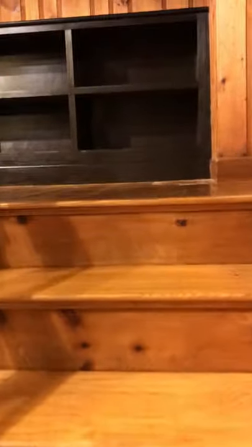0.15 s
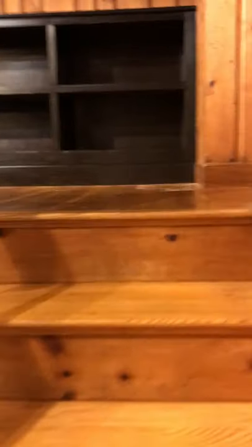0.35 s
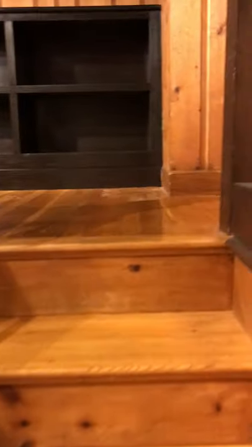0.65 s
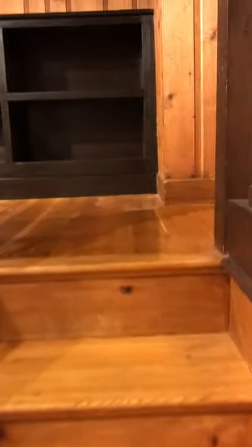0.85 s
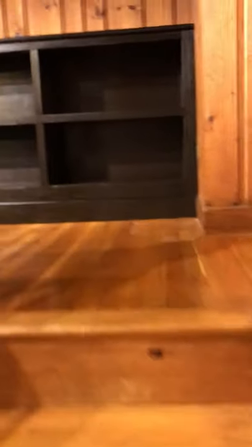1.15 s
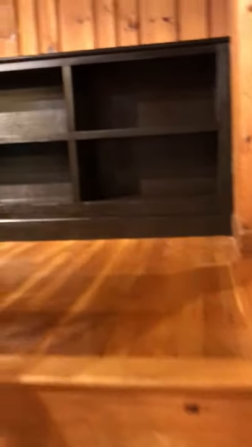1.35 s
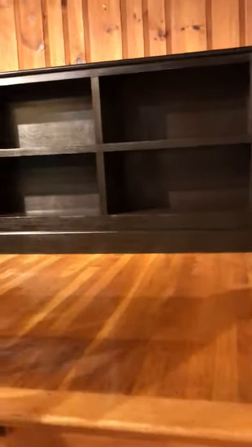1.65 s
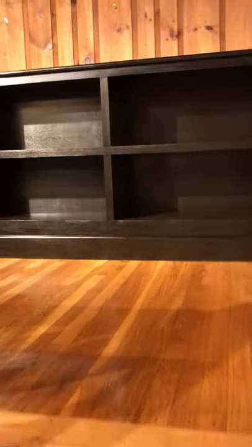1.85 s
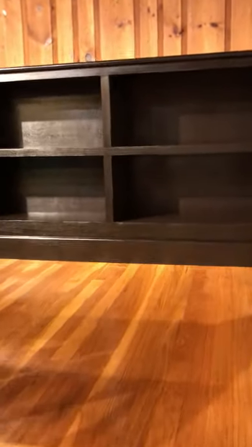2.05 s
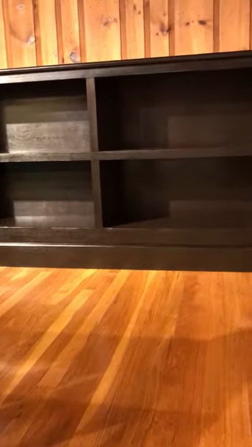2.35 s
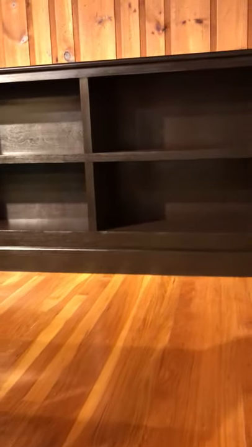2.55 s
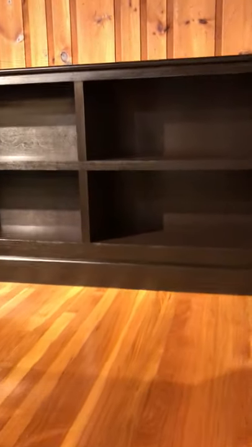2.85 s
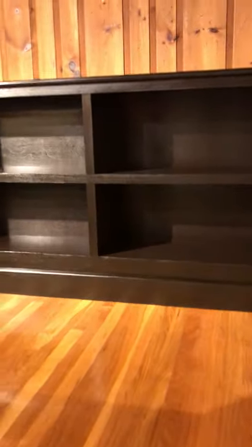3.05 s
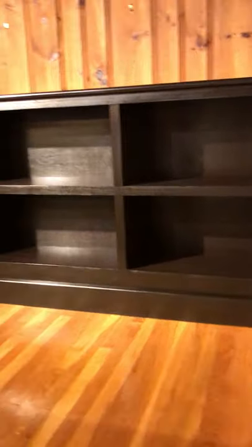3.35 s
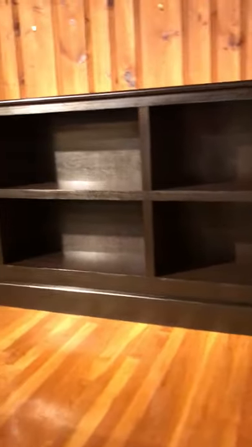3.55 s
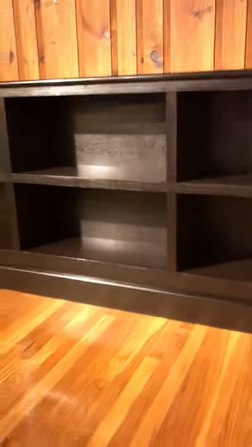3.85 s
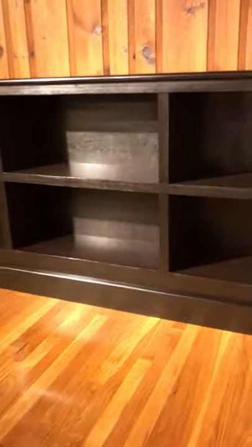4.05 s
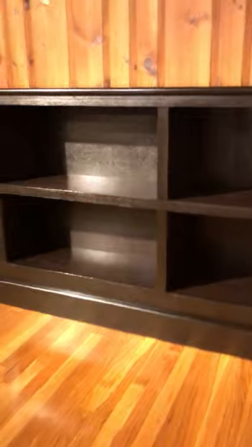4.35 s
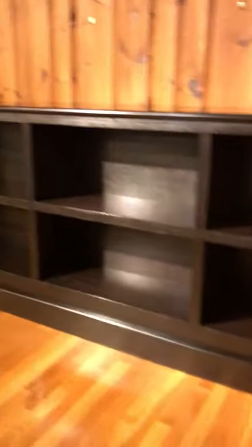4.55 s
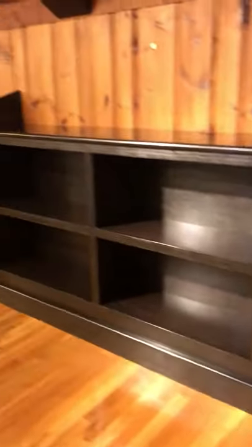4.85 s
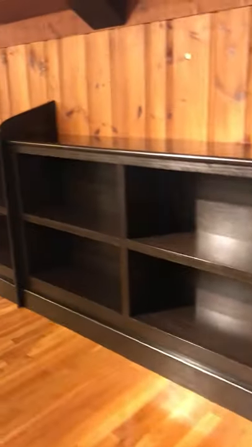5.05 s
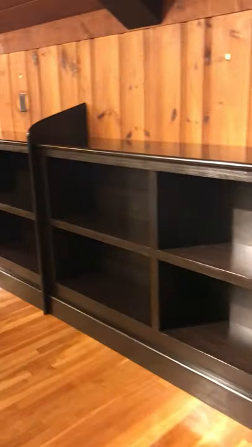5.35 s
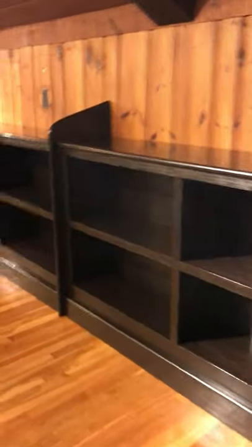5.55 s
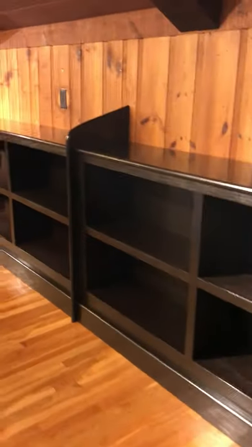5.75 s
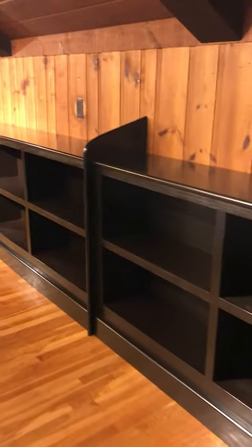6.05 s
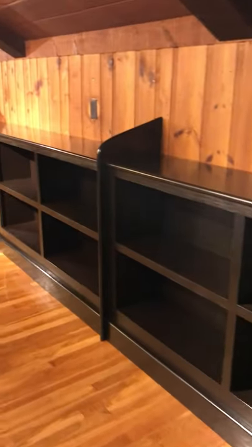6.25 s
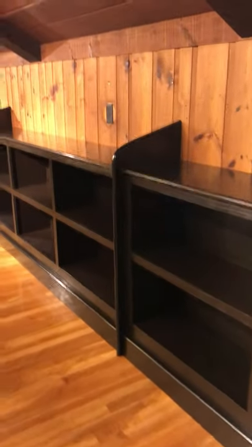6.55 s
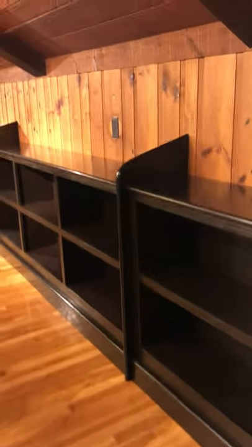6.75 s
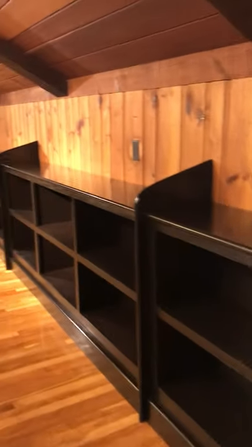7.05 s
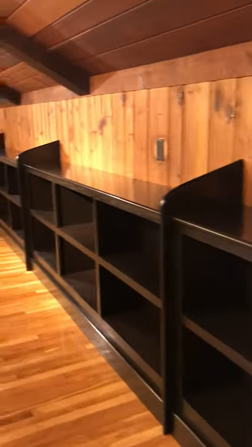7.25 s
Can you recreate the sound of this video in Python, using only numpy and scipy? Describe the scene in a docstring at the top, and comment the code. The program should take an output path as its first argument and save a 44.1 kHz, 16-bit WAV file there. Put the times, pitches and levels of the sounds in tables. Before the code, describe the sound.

Shoes thud and knock up wooden steps, then along floorboards at an unhurried pace in a quiet room.

```python
"""Over a faint hum and microphone hiss, weight rolls onto wood and clothes rustle as the legs swing.
Shoes climb hollow wooden stairs and walk on over a board floor in a panelled room. Each heel, toe and
settling joint excites wood and sole: a thud, knock, clack, crack and fizz in its own mix, then the room
rings on. Joints squeak faintly near 1.7, 2.3, 3.0 and 6.2 s; the steps go on to the end at 7.4 s."""
import sys
import numpy as np
from scipy import signal
from scipy.fft import rfft, irfft, next_fast_len
from scipy.io import wavfile
from scipy.ndimage import map_coordinates

SR = 44100
rng = np.random.default_rng(int(sys.argv[2]) if len(sys.argv) > 2 else 0)


def file_out(sig):
    """Save sig as 16-bit WAV at sys.argv[1]."""
    # one column per channel
    cols = np.atleast_2d(sig).T
    # limit, then scale
    lim = np.clip(cols, -1, 1)
    pcm = np.round(lim * 32767).astype(np.int16)
    wavfile.write(sys.argv[1], SR, pcm)


N = 326604


def amp(db):
    """Gain of a level in dB."""
    return 10 ** (np.asarray(db) / 20)


def unit_rms(x):
    """x at rms 1."""
    return x / np.sqrt(np.mean(x ** 2) + 1e-20)


def curve_at(points, hz):
    """(Hz, value) points interpolated on a log frequency axis."""
    points_hz, values = np.transpose(points)
    return np.interp(np.log(hz + 1), np.log(points_hz + 1), values)


def wobble(rate_hz):
    """Smooth random curve, rate_hz knots a second."""
    knots = rng.standard_normal(int(N * rate_hz / SR) + 4)
    return map_coordinates(knots, [np.arange(N) * rate_hz / SR])


def filtered(x, response):
    """x through a complex frequency response."""
    size = next_fast_len(N + SR // 2)
    return irfft(rfft(x, size) * response(np.fft.rfftfreq(size, 1 / SR)), size)[..., :N]


def resonances(modes, hz):
    """Causal response of a set of modes, unit power gain."""
    response = sum((-1) ** k * amp(db) * 1j * hz * width_hz / (mode_hz ** 2 - hz ** 2 + 1j * hz * width_hz)
                   for k, (mode_hz, width_hz, db) in enumerate(modes))
    # a yielding contact drives little far above the highest mode
    response = response / (1 + 1j * hz / (1.76 * modes[-1][0]))
    return response / np.sqrt(np.mean(np.abs(response) ** 2))


def grainy_noise(modes, grain_db):
    """Noise through modes, its level roughened by grain_db; rms 1."""
    noise = filtered(rng.standard_normal(N), lambda hz: resonances(modes, hz))
    return unit_rms(amp(grain_db) * noise)


def swells(peak_s, peak_db, rise_s, fall_s, rest_db):
    """Gain of overlapping swells, linear in dB, over a resting level."""
    hop = 32
    since_peak_s = np.arange(0, N, hop) / SR - peak_s[:, None]
    span_s = np.where(since_peak_s < 0, -rise_s[:, None], fall_s[:, None])
    level_db = peak_db[:, None] - 20 * since_peak_s / span_s
    power = amp(rest_db) ** 2 + np.sum(amp(level_db) ** 2, axis=0)
    return np.repeat(np.sqrt(power), hop)[:N]


# Background spectrum. Each row: frequency in Hz, relative density in dB.
BED_SPECTRUM = [(15, -35), (28, 21.5), (72, 8), (174, -10), (291, -8), (460, -18), (1150, -15), (1600, -21),
                (4500, -27.5), (5500, -25), (6250, -12), (7000, -21), (10500, -39), (14100, -21),
                (15800, -18)]


def hum_and_hiss(level_db=-69):
    """Steady noise: low hum of still air, microphone hiss."""
    noise = filtered(rng.standard_normal(N), lambda hz: amp(curve_at(BED_SPECTRUM, hz)))
    return amp(level_db) * unit_rms(noise)


# Modes of tread, board and sole. Each row: frequency in Hz, width in Hz, relative gain in dB.
TREAD_MODES = [(43.8, 15, -2.5), (55.8, 65, -6.5), (76, 26.7, 4.5), (110.4, 21, 0.5), (137, 31.4, 0),
               (194.4, 30.5, 0)]
BOARD_MODES = [(240.4, 44.5, 0.5), (331, 79, -0.5), (412.4, 83.5, -1.5), (572, 175, -3.5), (680, 160, -6)]
SOLE_MODES = [(763, 170, 4), (1010, 265, 5.5), (1272, 240, 6), (1662, 440, 3), (2255, 530, 1.5),
              (2953, 750, -1)]
# Weight shifts. Each row: peak in seconds, rumble and scuff in dB, 20 dB rise and fall in seconds.
WEIGHT_ROLLS = [(0, -57.5, -70, .1, .3), (.23, -50, -58.5, .07, .3), (.39, -49.5, -68, .13, .12),
                (.45, -66, -49, .09, .28), (.56, -55, -63, .4, .2), (1.03, -46, -60, .04, .14),
                (1.11, -62, -52.5, .25, .14), (1.3, -55, -61, .5, .25), (1.62, -63, -73, .3, .3),
                (1.99, -47, -60, .15, .22), (2.14, -65, -60, .8, .33), (2.56, -70, -66, .1, .2),
                (2.72, -43, -50.5, .06, .18), (2.82, -52, -58, .2, .65), (3.28, -62, -56, .25, .26),
                (3.77, -48.5, -63, .09, .4), (3.9, -58, -64, .5, .8), (4.2, -66, -67, .6, .2),
                (4.63, -50, -55.5, .15, .45), (4.77, -56, -66, .3, .15), (5.15, -64, -72, .5, .5),
                (5.63, -44, -49.5, .1, .3), (5.82, -60, -62, .3, .3), (6.53, -56, -67, .15, .5),
                (6.68, -68, -59, .25, .6), (6.86, -49, -62, .08, .15), (7.15, -58, -58, .3, .45),
                (7.35, -59, -70, .15, .2)]


def rolling_weight():
    """Weight rolls over a board: lumpy rumble in the wood, finer scuff in the sole."""
    peak_s, rumble_db, scuff_db, rise_s, fall_s = np.transpose(WEIGHT_ROLLS)
    lumps = wobble(30)
    rumble = grainy_noise(TREAD_MODES + BOARD_MODES, 2 * lumps)
    scuff = grainy_noise(SOLE_MODES, lumps + 0.8 * wobble(90))
    return (rumble * swells(peak_s, rumble_db, rise_s, fall_s, rest_db=-71)
            + scuff * swells(peak_s, scuff_db, rise_s, fall_s, rest_db=-78))


# Cloth friction bands. Each row: frequency in Hz, width in Hz, relative gain in dB.
RUSTLE_BANDS = [(3630, 1670, 0), (6290, 1340, 0)]
SWISH_BANDS = [(8330, 4600, 0), (13440, 2600, 0)]
# Leg swings. Each row: peak in seconds, rustle and swish in dB, 20 dB rise and fall in seconds.
LEG_SWINGS = [(.05, -76, -77, .3, .3), (.3, -71, -76, .2, .2), (.39, -62, -67, .05, .4),
              (.45, -56, -75, .12, .29), (1.12, -59, -74, .1, .28), (1.16, -68, -71, .1, .3),
              (1.29, -70, -71, .3, .15), (1.54, -73, -71, .08, .5), (1.67, -68, -74, .25, .25),
              (2.13, -66.5, -75, .3, .35), (2.56, -69, -78, .15, .2), (2.7, -63, -76, .1, .4),
              (2.78, -64, -73, .2, .18), (3.12, -64.5, -68, .13, .5), (3.27, -62, -72, .2, .3),
              (3.71, -68, -84, .12, .2), (3.88, -69, -79, .12, .2), (4.0, -74, -76, .15, .4),
              (4.12, -66, -75, .15, .35), (4.34, -78, -74, .15, .3), (4.41, -67, -82, .04, .2),
              (4.65, -63, -74, .13, .22), (4.96, -75, -78, .15, .8), (5.63, -58, -73, .08, .29),
              (5.85, -80, -81, .4, .3), (6.64, -64, -84, .12, .25), (6.85, -76, -78, .2, .2),
              (7.11, -64, -76, .12, .3)]


def clothes():
    """Cloth rubs as a leg swings: a rustle and a brighter swish with the same grain."""
    peak_s, rustle_db, swish_db, rise_s, fall_s = np.transpose(LEG_SWINGS)
    grain = wobble(150)
    rustle = grainy_noise(RUSTLE_BANDS, 0.75 * grain)
    swish = grainy_noise(SWISH_BANDS, 0.71 * grain)
    return (rustle * swells(peak_s, rustle_db, rise_s, fall_s, rest_db=-81)
            + swish * swells(peak_s, swish_db, rise_s, fall_s, rest_db=-81.5))


def struck_modes(modes, pitch_hz, db_per_octave):
    """Where the foot lands decides which modes speak: those far from the pitch are weaker."""
    return [(hz, width_hz, db - db_per_octave * abs(np.log2(hz / pitch_hz))) for hz, width_hz, db in modes]


# Treble modes of a contact. Each row: frequency in Hz, width in Hz, relative gain in dB.
CRACK_MODES = [(3330, 2200, 1), (4770, 2200, 1), (6450, 1700, -3.5)]
FIZZ_MODES = [(8300, 790, 1), (13500, 3700, -4.8)]
# Heel, toe and joint contacts. Each row: start in seconds, clack, thud, knock, crack and fizz in dB,
# thud, knock and clack pitch in Hz, base decay time in seconds, relative ring-on of wood and room in dB.
STEP_CONTACTS = [(0.081, -59.5, -59, -67, -67, -70, 121, 396, 1140, 0.0067, 5.5),
                 (0.144, -55.5, -54, -52.5, -77, -78, 186, 342, 904, 0.013, 6),
                 (0.176, -51, -39.5, -50, -69, -79, 170, 221, 1070, 0.014, 0),
                 (0.197, -51, -48, -46, -76, -75, 70.0, 579, 1380, 0.0079, 1),
                 (0.221, -50, -38, -60, -65, -71, 199, 221, 991, 0.0056, -2.5),
                 (0.241, -45, -43, -42, -47.5, -84, 218, 223, 1230, 0.0094, -4),
                 (0.274, -45.5, -54, -46, -70, -79, 194, 293, 832, 0.013, -0.5),
                 (0.296, -51, -57, -38.5, -72, -73, 218, 229, 816, 0.0079, -6),
                 (0.359, -42.5, -42, -47, -41.5, -61, 91.5, 266, 2300, 0.01, 3),
                 (0.439, -48, -47, -40, -43.5, -61, 75.4, 257, 845, 0.012, 3),
                 (0.944, -40, -31, -36.5, -48.5, -69, 110, 320, 880, 0.0079, 0.5),
                 (1.02, -35.5, -38, -38, -32, -41.5, 113, 221, 1660, 0.0065, -10.5),
                 (1.082, -33, -27.5, -27.5, -35.5, -43.5, 116, 377, 2180, 0.0086, -10),
                 (1.116, -46, -40, -39, -67, -70, 186, 283, 880, 0.0059, 4),
                 (1.172, -34, -26.5, -28.5, -44.5, -50, 103, 360, 1180, 0.0082, -4),
                 (1.809, -55, -32.5, -37, -58, -67, 124, 221, 1130, 0.0053, -2.5),
                 (1.827, -45.5, -56, -49, -49, -71, 67.3, 253, 1180, 0.0091, 1.5),
                 (1.852, -51, -40, -46, -62, -79, 102, 328, 1730, 0.0084, 4.5),
                 (1.884, -47, -67, -44.5, -54, -81, 143, 417, 1120, 0.014, -0.5),
                 (1.902, -54, -50, -42.5, -76, -85, 210, 221, 1390, 0.0062, 1),
                 (1.978, -45, -44, -60, -56, -85, 110, 388, 1520, 0.0076, 0),
                 (2.022, -50, -49, -50, -72, -78, 110, 401, 1710, 0.0069, 0),
                 (2.097, -54, -46, -45.5, -57, -83, 127, 331, 1010, 0.0074, 3.5),
                 (2.14, -63, -53, -60, -59, -72, 82, 240, 1130, 0.0064, 3),
                 (2.321, -59, -61, -63.5, -66, -78, 186, 710, 1060, 0.0074, 6),
                 (2.53, -54.5, -61, -49, -54.5, -81, 91.5, 340, 816, 0.0076, 2),
                 (2.63, -31, -31, -27.5, -41, -80, 164, 611, 790, 0.011, -2.5),
                 (2.642, -31, -39, -41, -68, -80, 218, 245, 842, 0.005, -4),
                 (2.71, -39.5, -48, -33, -49, -59, 140, 270, 926, 0.0062, -1.5),
                 (2.735, -50, -42, -40, -51.5, -77, 218, 238, 851, 0.0075, 2.5),
                 (2.765, -41.5, -42.5, -36.5, -66, -75, 146, 346, 1050, 0.016, 4),
                 (3.179, -40.5, -61, -47.5, -39.5, -51, 167, 724, 1110, 0.0067, 5),
                 (3.196, -32, -66, -47, -38, -39.5, 218, 799, 970, 0.01, -5),
                 (3.534, -72, -68, -64, -55, -54, 70.0, 310, 960, 0.0033, -3),
                 (3.56, -48.5, -44, -40.5, -53, -76, 147, 267, 1490, 0.0094, 2),
                 (3.646, -54, -72, -64, -62, -58, 210, 221, 926, 0.0066, 1),
                 (3.657, -45.5, -46, -44, -54.5, -60, 218, 366, 2180, 0.0066, -1),
                 (3.667, -42, -39, -38, -66, -70, 153, 535, 1010, 0.0088, -3),
                 (3.81, -51.5, -50, -63, -69, -81, 113, 377, 1380, 0.0065, 11),
                 (4.06, -47, -51.5, -45.5, -49, -81, 127, 226, 853, 0.007, 5),
                 (4.385, -37.5, -35, -35, -66, -92, 162, 221, 830, 0.0086, -3.5),
                 (4.406, -45, -41, -38.5, -81, -83, 218, 226, 990, 0.0066, 1),
                 (4.443, -50.5, -61, -43, -74, -83, 159, 256, 832, 0.0075, 0.5),
                 (4.577, -51, -55, -52, -48.5, -69, 124, 221, 1300, 0.0051, 10),
                 (5.103, -67, -58, -57.5, -72, -82, 161, 266, 1100, 0.0067, 0.5),
                 (5.238, -62, -70, -66, -75, -85, 160, 400, 1200, .006, -3),
                 (5.318, -63, -70, -66, -75, -85, 160, 400, 1200, .006, -3),
                 (5.373, -44.5, -46, -41.5, -75, -79, 178, 570, 1250, 0.01, -2.5),
                 (5.425, -48.5, -57, -53, -53.5, -69, 56.5, 458, 1090, 0.01, 4),
                 (5.54, -40, -41.5, -37, -42, -62, 159, 398, 1360, 0.0074, 5),
                 (5.652, -45, -38, -36.5, -62, -87, 171, 250, 802, 0.014, -4),
                 (6.351, -72, -88, -57.5, -83, -80, 116, 305, 915, 0.0081, -4),
                 (6.492, -54, -45, -53.5, -83, -79, 184, 231, 856, 0.014, -1),
                 (6.558, -58, -51.5, -61, -55, -66, 148, 221, 2310, 0.0092, -2),
                 (6.568, -37.5, -66, -54, -44, -62, 186, 506, 1190, 0.0048, -11),
                 (6.574, -36.5, -52, -66, -42, -57, 72.7, 773, 1500, 0.0093, -0.5),
                 (6.687, -48, -45.5, -45.5, -63, -67, 167, 563, 958, 0.0079, -1.5),
                 (6.713, -53, -50, -66, -62, -69, 53.8, 277, 1110, 0.0077, 7),
                 (6.827, -53, -43.5, -44, -66, -75, 172, 292, 1160, 0.013, 0),
                 (6.898, -49, -74, -57, -80, -79, 88.8, 273, 929, 0.014, -7),
                 (7.04, -39.5, -48, -44.5, -52, -63, 172, 443, 974, 0.0087, 2.5),
                 (7.054, -43.5, -53, -42, -45.5, -56, 186, 305, 1030, 0.0072, 5),
                 (7.307, -59, -73, -61, -63.5, -80, 99.6, 256, 861, 0.011, 4),
                 (7.371, -55, -45, -63, -60, -72, 171, 221, 1170, 0.0082, 8.5),
                 (7.39, -42, -67, -50, -49, -62, 105, 396, 1270, 0.015, 0)]


def footsteps():
    """Each contact drives five sets of modes with a blow and a dying, gritty force; the room answers."""
    wet_n, direct_n = 2 ** 15, 2 ** 13
    t, hz = np.arange(direct_n) / SR, np.fft.rfftfreq(wet_n, 1 / SR)
    # part order: thud, knock, clack, crack, fizz
    decay_scale = np.vstack([1.3, 1.1, .7, .55, .45])  # heavy parts are pushed for longer
    blow = np.vstack([1.8, 1.5, 1.0, .8, .5])
    send_db = np.vstack([.1, .1, -.6, -1.5, -2.5])  # the room takes up less of the bright parts
    out = np.zeros(N + wet_n)
    for row, tail in zip(STEP_CONTACTS, room_tails(len(STEP_CONTACTS))):
        start_s, clack_db, thud_db, knock_db, crack_db, fizz_db = row[:6]
        thud_hz, knock_hz, clack_hz, base_decay_s, ring_db = row[6:]
        parts = (struck_modes(TREAD_MODES, thud_hz, db_per_octave=8),
                 struck_modes(BOARD_MODES, knock_hz, db_per_octave=4.5),
                 struck_modes(SOLE_MODES, clack_hz, db_per_octave=7), CRACK_MODES, FIZZ_MODES)
        response = np.array([resonances(modes, hz) for modes in parts])
        direct_response = response[:, ::wet_n // direct_n]
        decay_s = base_decay_s * decay_scale
        envelope = np.exp(-t / decay_s) * (1 - np.exp(-t / (0.2 * decay_s)))
        envelope_norm = np.linalg.norm(envelope, axis=1, keepdims=True)
        grit = rng.standard_normal(envelope.shape) * amp(4.6 * rng.standard_normal(direct_n))
        force = envelope * unit_rms(grit)
        force[:, :1] += envelope_norm * blow
        strength = amp(np.vstack([thud_db, knock_db, clack_db, crack_db, fizz_db])) * envelope_norm
        direct = irfft(rfft(force) * direct_response, direct_n)
        direct *= strength / np.linalg.norm(direct, axis=1, keepdims=True)
        room_send = (strength * amp(send_db) * response).sum(axis=0)
        wet = irfft(rfft(tail, wet_n) * room_send, wet_n)
        # the sole's edge lands with a dry tick in the crack modes
        tick = irfft(rfft(grit[3] * np.exp(-t / 0.001)) * direct_response[3], direct_n)
        start = round(start_s * SR)
        out[start:start + direct_n] += amp(clack_db - 16.5) * tick + direct.sum(axis=0)
        out[start:start + wet_n] += amp(ring_db) * wet
    return out[:N]


# Room decay. Each row: frequency in Hz, time to fall 60 dB in seconds.
ROOM_T60 = [(60, 0.86), (160, 0.32), (420, 0.4), (1100, 0.31), (2900, 0.23), (7700, 0.5), (15000, 0.18)]


def room_tails(count, onset_s=0.0045):
    """Noise tails of energy 1: the walls answer within milliseconds, each band dies at its own rate."""
    hz, frame_s, spectra = signal.stft(rng.standard_normal((count, SR * 3 // 4)), SR, nperseg=256)
    decay_db = -60 * frame_s / curve_at(ROOM_T60, hz)[:, None]
    _, tails = signal.istft(spectra * amp(decay_db), SR, nperseg=256)
    t = np.arange(tails.shape[1]) / SR
    tails *= 1 - np.exp(-(t / onset_s) ** 2)
    return tails / np.linalg.norm(tails, axis=1, keepdims=True)


# Joint squeaks. Each row: start in seconds, nominal level in dB, pitch in Hz, length in seconds.
JOINT_SQUEAKS = [(1.706, -68, 2050, 0.024), (1.708, -70, 2420, .015), (2.328, -60, 700, 0.022),
                 (3.041, -57, 1200, 0.021), (6.243, -67, 1050, .015), (6.245, -73, 2050, .015),
                 (6.245, -72, 4600, 0.021)]


def joint_squeaks():
    """Wood joints give brief, soft-edged tones that shake in pitch and strength."""
    roughness = .7 + .9 * wobble(300)
    jitter_s = 4e-5 * wobble(400)
    out = np.zeros(N)
    for start_s, level_db, pitch_hz, length_s in JOINT_SQUEAKS:
        span = np.arange(round((start_s - 2 * length_s) * SR), round((start_s + 3 * length_s) * SR))
        t = span / SR
        envelope = np.exp(-((t - start_s - length_s / 2) / (0.77 * length_s)) ** 2)
        out[span] += amp(level_db) * envelope * np.sin(2 * np.pi * pitch_hz * (t + jitter_s[span]))
    return roughness * out


def scene():
    """Mono mix of the walker's sounds over the background."""
    return (footsteps() + joint_squeaks() + rolling_weight() + clothes() + hum_and_hiss())[None]


# Microphone treble response. Each row: frequency in Hz, gain in dB.
MIC_RESPONSE = [(5500, -0.15), (6300, -0.7), (7700, -1), (8700, 0.3), (9800, 0.2), (10450, -3.5),
                (11200, -0.1), (15000, 1.5)]


def record(dry):
    """The microphone loses the deepest bass, has dips in the treble and cuts off at its band limit."""
    low_cut_hz, band_limit_hz = 45, 15760

    def response(hz):
        high_pass = (1j * hz / (low_cut_hz + 1j * hz)) ** 2
        return high_pass * amp(curve_at(MIC_RESPONSE, hz)) * (hz < band_limit_hz)
    return filtered(dry, response)


dry = scene()
out = record(dry)
file_out(out)
```